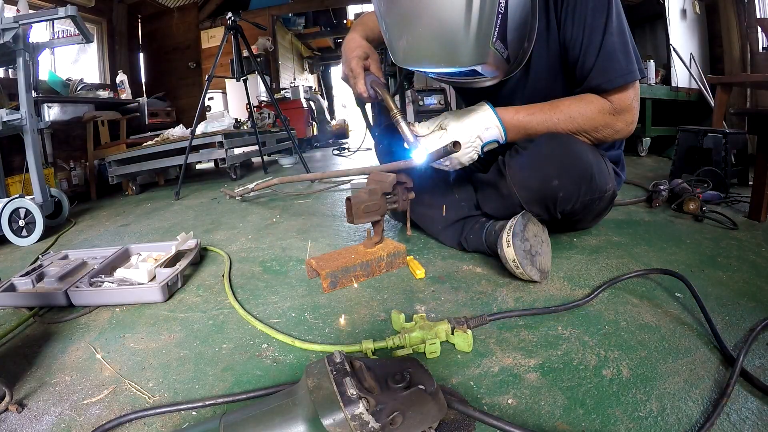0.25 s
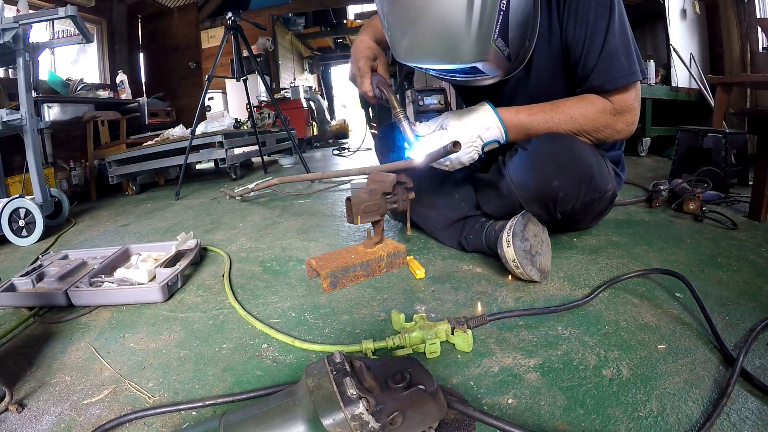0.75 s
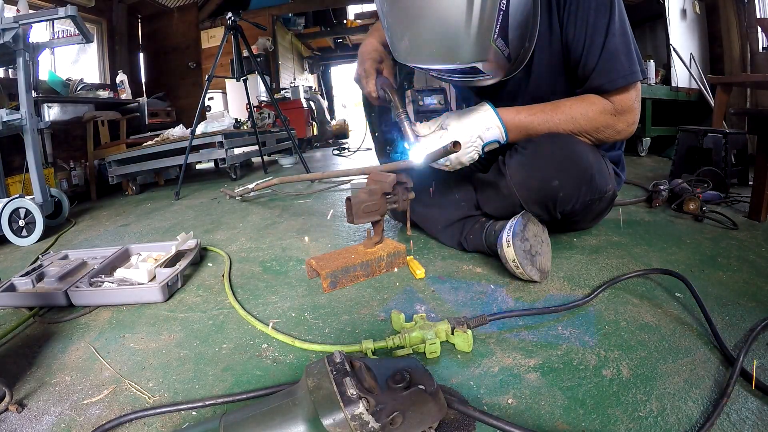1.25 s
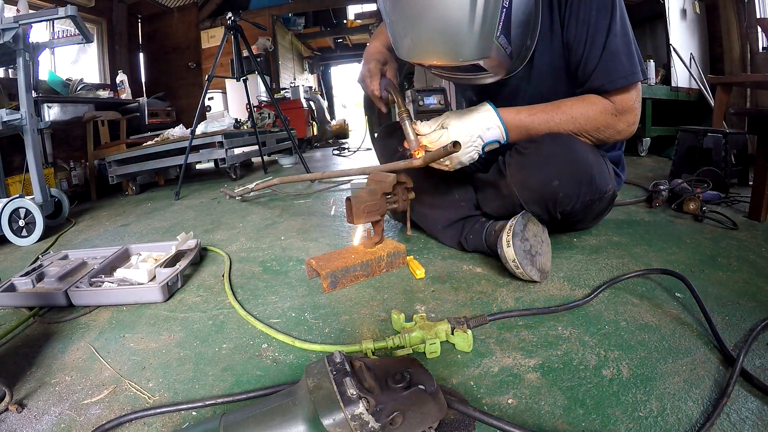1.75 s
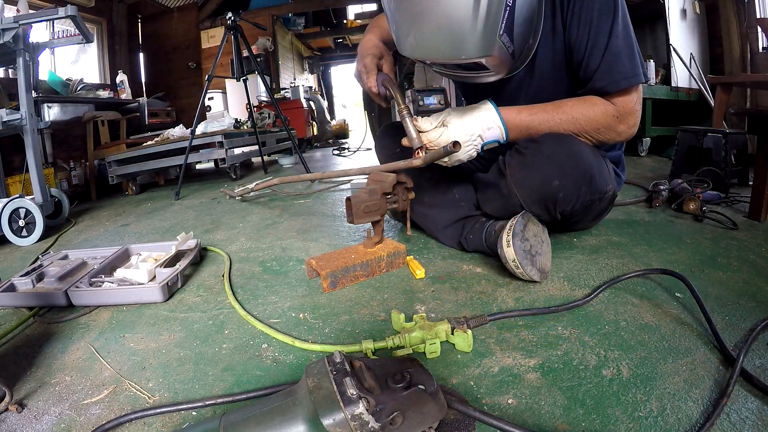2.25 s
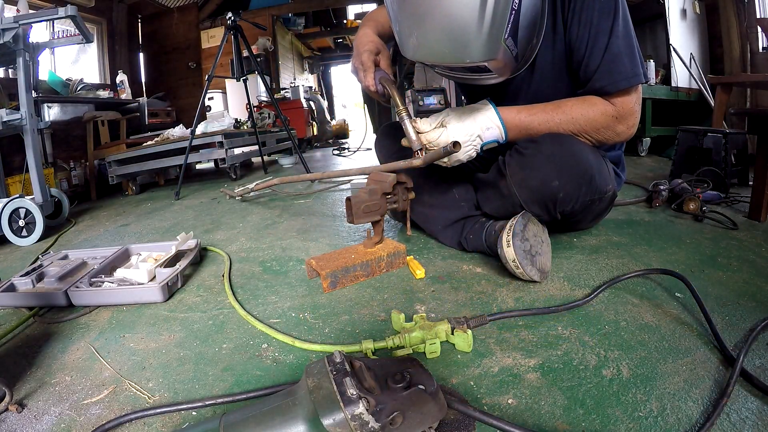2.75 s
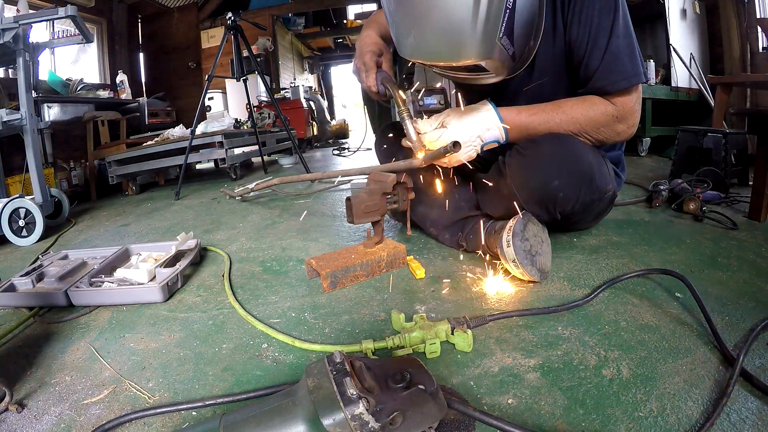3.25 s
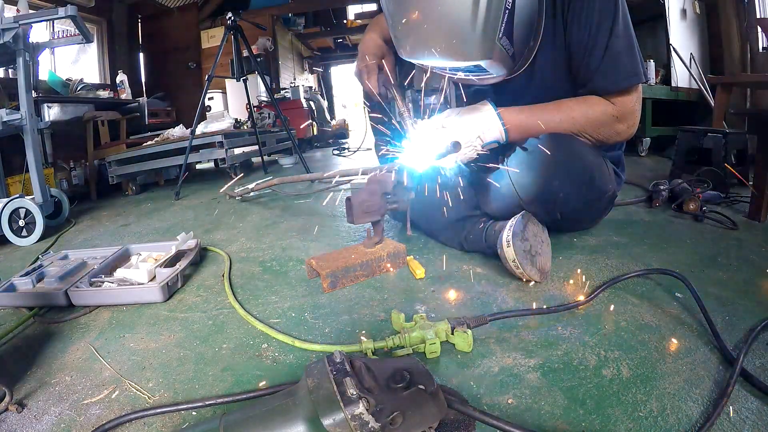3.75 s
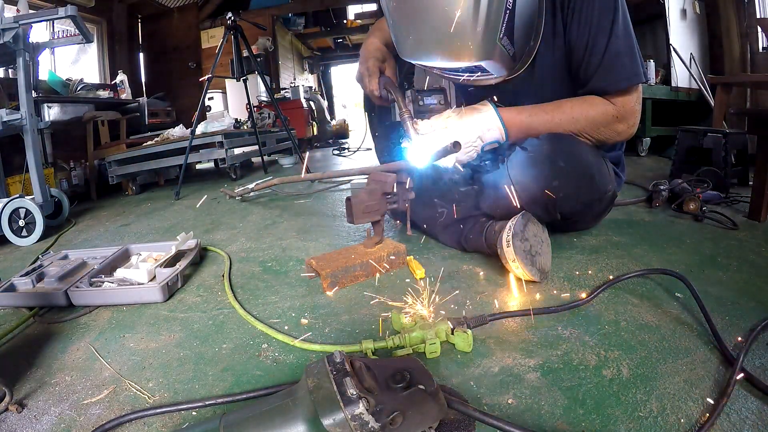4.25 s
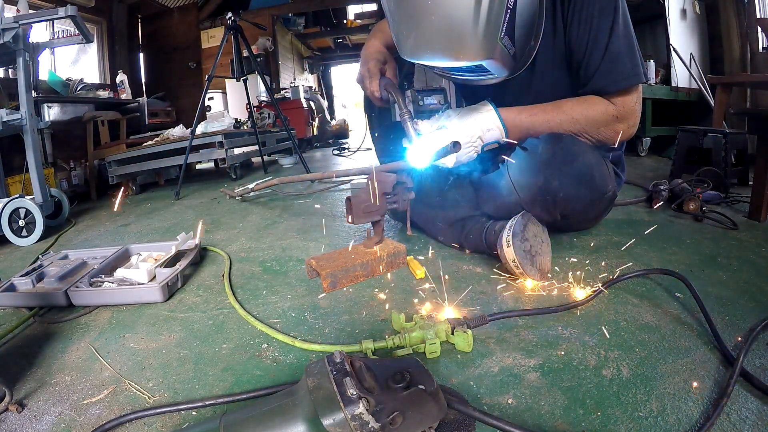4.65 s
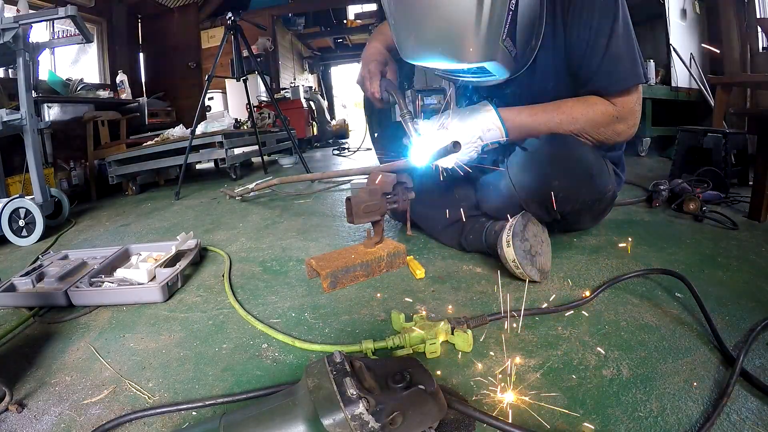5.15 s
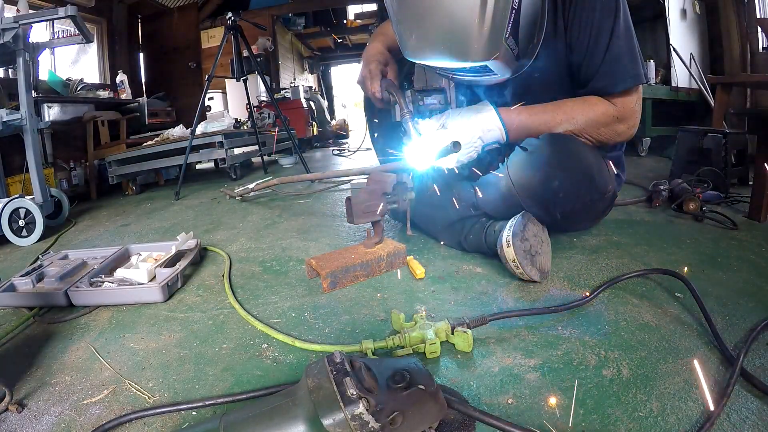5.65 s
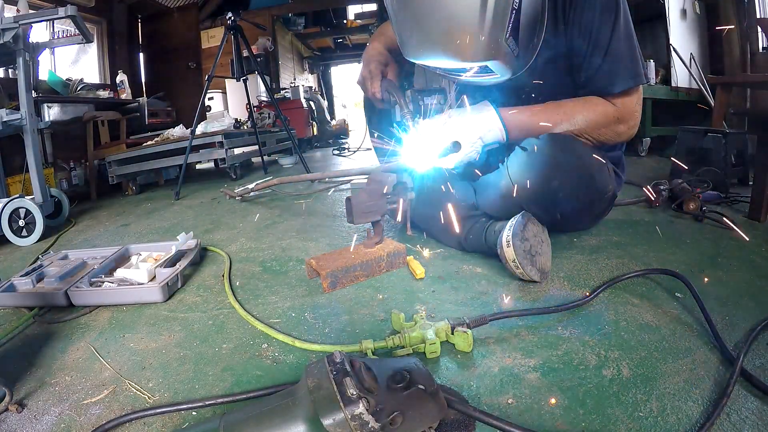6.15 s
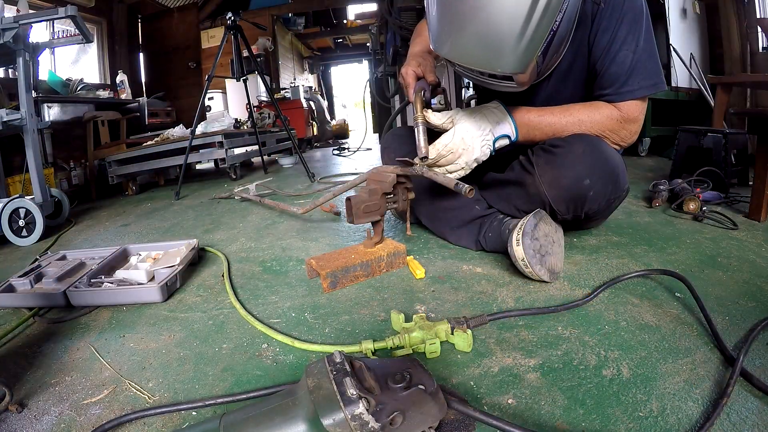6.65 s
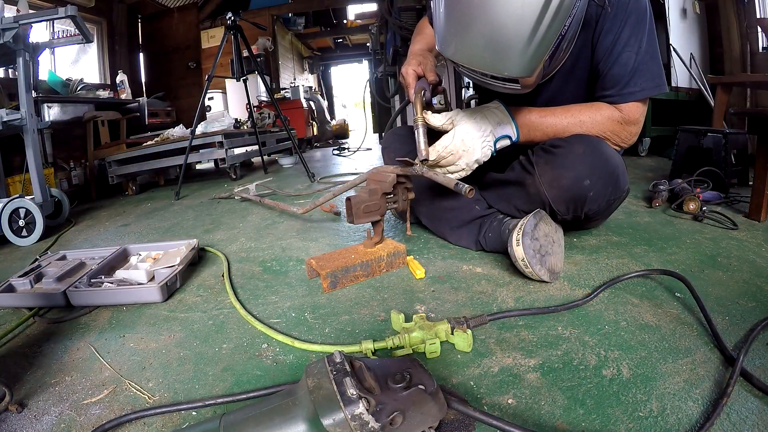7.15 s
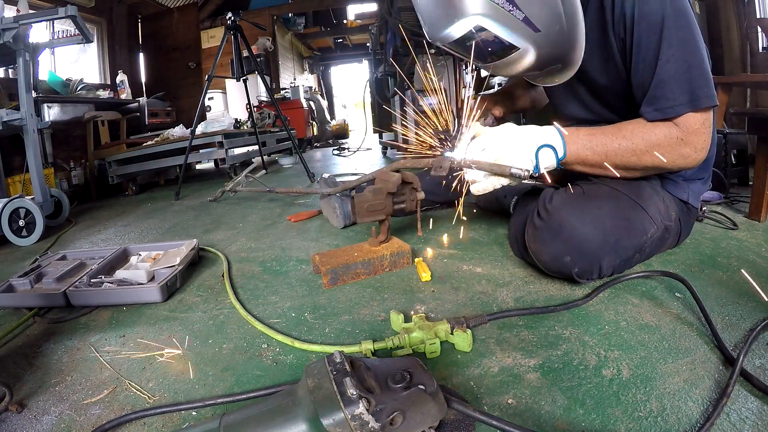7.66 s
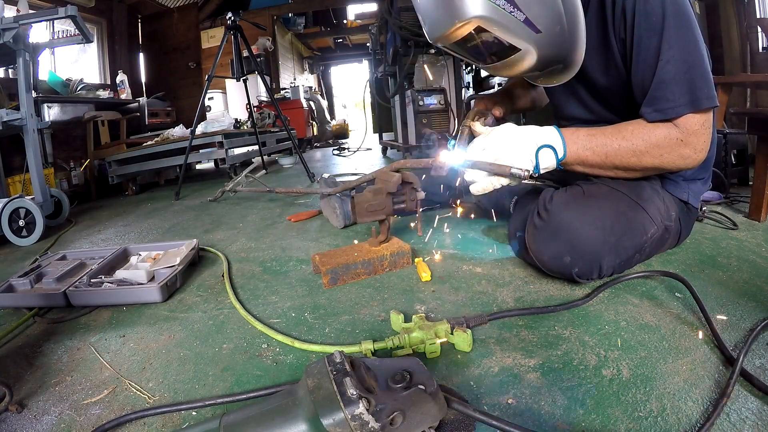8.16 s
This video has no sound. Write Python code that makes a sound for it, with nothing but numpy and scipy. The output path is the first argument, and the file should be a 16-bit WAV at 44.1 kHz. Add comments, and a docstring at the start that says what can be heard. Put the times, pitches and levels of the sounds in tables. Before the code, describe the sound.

A small stereo camera on a workshop floor hears a wire-feed welder. Its fan runs throughout, a steady mid-low hum near 650 Hz with airy rush and slight case resonance. From 0 to 1.6 s the arc stutters: sharp noisy snaps with short low thumps, brief frying, and rapid buzzing runs around 0.45-0.6 and 0.9-1.1. Bright shed echoes fade, leaving mostly hum until about 3 s. Then denser, harder crackling lasts to 6.2 s, uneven in strength, with a faint deep rumble swelling around 4 s and thinning away. At 6.25 an abrupt cut leaves the fan alone, noticeably fuller. At 7.6 another cut enters on a fading noise tail, followed by separate pops of altered colour at roughly 7.7, 7.8, 8.0 and 8.3. Automatic gain ducks sharply at loud cracks and gradually recovers.

```python
"""A wire-feed welder tacks a steel pipe in a workshop over its fan, heard from a small camera on the floor.
From the start the wire shorts and blows clear in pops and quick runs: a noise-burst crack and a thump of gas,
both doubled by the floor, then frying grains and the shed's bright noise-tail echo. Around 4 s a rumble swells.
At 6.25 s a jump cut chops off the crackle and leaves the fan's blade tones, air and case resonances; at 7.6 s
another lands in a fading pop tail, then pops of another colour. Within each part a gain control ducks at hard
pops and swells back steadily; it jumps at the cuts."""
import sys
import numpy as np
from scipy import signal
from scipy.fft import rfft, irfft
from scipy.io import wavfile
from scipy.ndimage import uniform_filter1d

SR = 44100
rng = np.random.default_rng(int(sys.argv[2]) if len(sys.argv) > 2 else 0)


def generate_wav(sig):
    """Save sig (samples, or channels by samples) to the path in sys.argv[1] as 16-bit PCM at SR."""
    pcm = np.round(np.clip(np.atleast_2d(sig).T, -1, 1) * 32767).astype(np.int16)
    wavfile.write(sys.argv[1], SR, pcm)


N = 370440
TIME = np.arange(N) / SR
# jump cuts bound a part with the fan alone
FAN_ALONE_START_S, FAN_ALONE_END_S = 6.249, 7.596

# colour of the bursting wire, for cracks and sizzle: pitch_hz, relative_level_db (per Hz)
CRACK_COLOUR = [(300,-24), (1300,-14.5), (1820,-2.5), (2250,-12), (2700,-23.5), (3400,-15.5), (4100,-8),
                (4750,-20), (6000,-7), (7800,-13), (8500,-15.5), (11300,-25.5), (14000,-18), (16000,-24)]
# bright colour of the shed's echo, also of the fading tails: pitch_hz, relative_level_db (per Hz)
SHED_COLOUR = [(50,-19.5), (110,-13.5), (165,22.5), (280,6.5), (500,8.5), (900,6.5), (1400,-1.5),
               (1850,-1.5), (2700,-8.5), (4100,-2.5), (4900,-5), (6300,2), (7800,4), (8400,-4.5),
               (11500,-11), (15000,-23)]


def undb(db):
    """Decibels to gain."""
    return 10 ** (np.asarray(db) / 20)


def unit(x):
    """Scale to rms 1."""
    return x / np.sqrt(np.mean(x ** 2))


def colour(x, spectrum):
    """Causal minimum-phase filter with the given (Hz, dB) response, built from its cepstrum."""
    size = 4096
    hz, db = np.transpose(spectrum)
    bins = np.log(np.fft.rfftfreq(size, 1 / SR) + 1)
    gain = undb(np.interp(bins, np.log(hz), db))
    # folding the cepstrum forward in time makes the response causal
    cepstrum = irfft(np.log(gain))[:size // 2]
    cepstrum[1:] *= 2
    response = irfft(np.exp(rfft(cepstrum, size)))
    return signal.oaconvolve(np.atleast_2d(x), response[None], axes=1)[:, :x.shape[-1]]


def stereo_noise(size, apart_hz=1100):
    """Noise at two close ports: alike in the bass, unrelated in the treble."""
    mid, side = rfft(rng.standard_normal((2, size)))
    alike = np.exp(-(np.fft.rfftfreq(size, 1 / SR) / apart_hz) ** 2) ** .5
    mid = mid * np.sqrt(1 + alike)
    side = side * np.sqrt(1 - alike)
    return unit(irfft([mid + side, mid - side], size))


def walk(rate):
    """Slow random drift of rms 1, with `rate` fresh values per second."""
    k = int(SR / rate)
    steps = np.repeat(rng.standard_normal(N // k + 1), k)
    return unit(uniform_filter1d(steps, k)[:N])


def strike(times, gains, shapes):
    """Lay one scaled shape at each time."""
    out = np.zeros((shapes.shape[1], N + shapes.shape[2]))
    for s, gain, shape in zip(times, gains, shapes):
        i = int(np.clip(s * SR, 0, N))
        out[:, i:i + shape.shape[1]] += gain * shape
    return out[:, :N]


def floor_bounce(x, lag_s, share):
    """The concrete floor sends a weaker second copy just behind the first."""
    late = np.array([np.interp(TIME - lag_s, TIME, row, left=0) for row in x])
    return x + share * late


def fan(air_db=-33, waver_db=2.07, wander_hz=0.082, case_width_hz=9):
    """The blades sing over rushing air, which also stirs the resonances of the case."""
    shaft_hz = 92.57
    # tones of the seven-bladed fan: multiple_of_shaft_rate, level_db (rms)
    fan_orders = [(4,-47), (5,-48), (7,-30), (11,-61.5), (12,-56.5), (21,-61.5)]
    # narrow resonances of the welder's case: pitch_hz, level_db (rms)
    case_modes = [(166,-46), (240,-46.5), (490,-53), (548,-47.5), (578,-48.5), (715,-51.5), (884,-54.5),
                  (8586,-79)]
    # colour of the rushing air: pitch_hz, relative_level_db (per Hz)
    air_colour = [(30,-40.5), (90,-39.5), (122,-28), (148,-3.5), (250,-0.5), (310,-7), (560,-3.5), (700,-8),
                  (800,-17.5), (1400,-21.5), (2000,-24.5), (2650,-32.5), (3300,-29), (4200,-37), (7300,-32),
                  (9300,-42.5), (14000,-63.5)]

    # wander_hz is the drift of the seventh order, the blade tone
    turns = np.cumsum(shaft_hz + wander_hz / 7 * walk(4.2)) / SR
    blades = 0
    for order, db in fan_orders:
        tone = np.sin(2 * np.pi * (order * turns + rng.random()))
        blades = blades + undb(db + waver_db * walk(3.9)) * tone
    case = 0
    for hz, db in case_modes:
        # a random complex envelope spreads the tone into a narrow band
        envelope = walk(case_width_hz) + 1j * walk(case_width_hz)
        case = case + undb(db) * np.real(envelope * np.exp(2j * np.pi * hz * TIME))
    air = unit(colour(stereo_noise(N), air_colour)) * undb(air_db + .5 * walk(3.38))
    return np.sqrt(2) * blades + case + air


def rumble():
    """A faint deep flutter of bass noise, strongest around 4 s."""
    # level of the rumble: time_s, level_db (rms)
    rumble_levels = [(3.55, -64), (4.0, -36), (4.45, -39.5), (4.8, -45), (5.4, -49), (5.8, -56)]
    deep = colour(stereo_noise(N), [(20, -20), (65, 10), (110, 13), (250, -37), (900, -82)])
    return unit(deep) * undb(np.interp(TIME, *np.transpose(rumble_levels)))


def fading_tails():
    """Fading tails of bright echo noise, some already sounding as a part opens."""
    # fading noise tails: start_s, level_db (at the start), fade_s
    tail_events = [(0.0, -22.5, 0.1), (3.17, -25.5, 0.17), (6.089, -17, 0.047), (7.595, -22.5, 0.099)]
    fades = sum(undb(db) * (TIME >= s) * np.exp(-abs(TIME - s) / fade) for s, db, fade in tail_events)
    return fades * unit(colour(stereo_noise(N), SHED_COLOUR))


def arc_pops():
    """Each time the wire shorts and blows clear it pops; returns (times, crack dB, thump dB)."""
    # single pops of the stuttering arc: start_s, relative_level_db, extra_thump_db
    single_pops = [(.0712,-15.5,0), (.1775,-21.5,2), (.3643,-9.5,1.5), (.4229,-15.5,2), (.5599,-20,5),
                   (.7303,-19,2.5), (.8154,-20,2), (1.2962,-13,0.5), (1.3203,-20,5), (1.3304,-18.5,-3.5),
                   (1.57,-22.5,2), (1.6193,-23,3), (2.9904,-26,8.5), (3.1472,-17,1.5), (3.1614,-20.5,1.5),
                   (3.2015,-18,4.5), (3.3345,-10.5,3.5), (3.4663,-17,3), (3.4932,-16,5), (3.7474,-13,0),
                   (3.901,-10,2), (4.003,-15,4.5), (4.0456,-16,4), (4.099,-12.5,3), (4.2,-20,4.5),
                   (4.2355,-20,5.5), (4.2407,-27.5,5), (4.358,-20,3.5), (4.3934,-17.5,2), (4.403,-17,1.5),
                   (4.4216,-24.5,1), (4.4413,-20,3), (4.453,-25,8), (4.5984,-15,1), (4.818,-26.5,6.5),
                   (4.8363,-24,6), (4.88,-20,-0.5), (5.0097,-16.5,2), (5.1805,-16,2), (5.2464,-18,0.5),
                   (5.425,-11,1), (5.5454,-16,2), (5.595,-17,2.5), (5.65,-19.5,1), (5.699,-17.5,2),
                   (5.72,-27.5,6), (5.8897,-16,1), (6.0003,-19.5,1.5), (6.015,-23.5,4), (6.0797,-11.5,1),
                   (6.1106,-17,3), (6.1413,-20.5,5), (6.1907,-15.5,1), (7.68,-14,5.5), (7.8266,-13.5,3),
                   (7.9813,-13,2.5), (8.116,-24.5,6), (8.203,-22,5), (8.2903,-12.5,3)]
    # runs of repeated shorting: start_s, end_s, rate_per_s, relative_level_db, extra_thump_db
    pop_runs = [(0.4396,0.6166,118,-19.5,1.5), (0.9041,0.926,104,-18.5,-0.5), (.943,1.061,125,-22.5,3),
                (1.083,1.129,45,-22,2), (1.346,1.4157,43,-20.5,1), (3.603,3.6643,113,-14.5,3),
                (3.756,3.776,106,-19,4.5), (4.8983,4.917,88,-21.5,2.5), (5.264,5.276,140,-18.5,1.5),
                (5.6127,5.6332,86,-21.5,1.5), (6.2096,6.241,68,-19,4.5)]
    # pops within a run scatter in time, strength and thump weight
    jitter_s, scatter_db = 0.00072, 2.7

    runs = []
    for start, end, rate, db, weight in pop_runs:
        count = round((end - start) * rate) + 1
        runs += [(s, db, weight) for s in np.linspace(start, end, count)]
    runs = np.array(runs)
    runs = runs + rng.standard_normal(runs.shape) * [jitter_s, scatter_db, scatter_db]
    times, db, weight = np.vstack([single_pops, runs]).T
    return times, db, db + weight


def shed(pops, t60_s=0.49, low_t60_s=0.26, early_s=0.18, early=0.64, gap_s=0.0052, growth=0.86, echo_db=-6):
    """Cluttered walls scatter every pop into a noise tail whose treble lingers longest."""
    times, crack_db, thump_db = pops
    t = TIME[:SR * 4 // 5]
    onset = 1 - np.exp(-(t / gap_s) ** 2)
    scatter = colour(stereo_noise(len(t)), SHED_COLOUR) * onset * (1 + early * np.exp(-t / early_s))
    out = 0
    for kind, db, t60 in (("lowpass", thump_db, low_t60_s), ("highpass", crack_db, t60_s)):
        split = signal.butter(2, 900, kind, fs=SR, output="sos")
        tail = signal.sosfilt(split, scatter) * np.exp(-np.log(1000) * t / t60)
        # growth below 1 lets hard pops stand further out of their echo
        kicks = strike(times, undb(growth * db + echo_db), np.ones((len(times), 1, 1)))
        out = out + signal.oaconvolve(kicks, tail, axes=1)[:, :N]
    return out


def sizzle(pops, fade_s=0.0072, grain_db=5, sizzle_db=-5):
    """After each pop the relit arc fries for a moment in fine grains."""
    times, db, _ = pops
    t = TIME[:SR // 8]
    frying = (1 - np.exp(-t / 0.00017)) * np.exp(-t / fade_s)
    # overlapping frying adds up in power
    power = strike(times, undb(db + sizzle_db) ** 2, np.tile(frying ** 2, (len(times), 1, 1)))
    grains = undb(grain_db * np.repeat(rng.standard_normal(N // 20 + 1), 20)[:N])
    return np.sqrt(power) * unit(colour(stereo_noise(N, apart_hz=7160) * grains, CRACK_COLOUR))


def thumps(pops, push_s=.0001, uneven_db=3, thump_db=46):
    """The gas round the arc heaves once: a pressure swing, now sharper, now softer, that rings in the bass."""
    # ring of the heaving gas: pitch_hz, relative_level_db (per Hz)
    thump_colour = [(30,-30.5), (80,-29), (115,-17), (160,3), (240,2), (360,-5.5), (520,-0.5), (680,-8.5),
                    (850,-19), (1300,-26.5), (3000,-44), (8000,-68)]
    times, _, db = pops
    lengths = push_s * undb(uneven_db * rng.standard_normal((len(times), 1, 1)))
    pushes = np.exp(-TIME[:SR // 200] / lengths)
    pushes = pushes / pushes.sum(axis=2, keepdims=True)
    kicks = strike(times, -undb(db + thump_db), pushes)
    return floor_bounce(colour(kicks, thump_colour), 0.0013, 0.13)


def cracks(pops, apart=1.0, apart_hz=8200, apart_width_hz=2000, snap_s=0.014, crack_db=42):
    """The molten bridge bursts: a snap of harsh noise with an even spectrum, different every time."""
    # keener edge of the first spell, from the torch's angle: pitch_hz, relative_level_db (per Hz)
    first_colour = [(300,-27), (1300,-14), (1850,-2.5), (2250,-13), (2700,-21.5), (3400,-14.5), (4100,-8),
                    (4750,-20), (6050,-2), (7000,-16.5), (9800,-14.5), (11400,-31), (14500,-19.5),
                    (16000,-24)]
    # torch held at a new angle in the last part: pitch_hz, relative_level_db (per Hz)
    turned_colour = [(300,-28), (1300,-18), (1750,-2), (2400,-6), (2950,-23.5), (3500,-8.5), (4500,-10),
                     (5300,-18), (7300,-5.5), (9000,-18), (11500,-22.5), (14000,-19), (16000,-30)]
    first_spell_end_s, burst_s = 2.0, .0012

    times, db, _ = pops
    t = TIME[:SR // 100]
    noise = rng.standard_normal((len(times), 2, len(t))) * np.exp(-(t / burst_s) ** 2)
    mid, side = rfft(noise).transpose(1, 0, 2)
    # waves about as long as the camera is wide reach the two ports differently
    hz = np.fft.rfftfreq(len(t), 1 / SR)
    side = side * apart * np.exp(-((hz - apart_hz) / apart_width_hz) ** 2)
    # keeping only the phase evens the spectrum
    even = irfft(np.exp(1j * np.angle([mid + side, mid - side])), len(t))
    # the angle of the torch gives each spell its own colour
    spell = np.searchsorted([first_spell_end_s, FAN_ALONE_END_S], times)[:, None]
    colours = (first_colour, CRACK_COLOUR, turned_colour)
    bursts = np.stack([np.choose(spell, [colour(port, c) for c in colours]) for port in even], axis=1)
    bursts *= np.exp(-(t / snap_s) ** 2)
    return floor_bounce(strike(times, undb(db + crack_db), bursts), 0.00162, 0.17)


def scene():
    """Welding over the steady fan, with jump cuts into and out of the fan alone."""
    pops = arc_pops()
    active = (TIME < FAN_ALONE_START_S) | (TIME > FAN_ALONE_END_S)
    welding = uniform_filter1d(1. * active, size=100)
    arc = cracks(pops) + thumps(pops) + sizzle(pops) + shed(pops) + fading_tails() + rumble()
    return arc * welding + fan()


def gain_control(x, opening_db):
    """Sharp sounds push the gain down at once; it creeps back at a steady rate."""
    # treble level where ducking starts, share of the excess taken away, speed of the swell back
    duck_above_db, duck_share, recover_db_per_s = -25, 0.86, 10.5
    treble = signal.sosfilt(signal.butter(2, 1000, "highpass", fs=SR, output="sos"), x)
    level_db = 10 * np.log10(uniform_filter1d(np.mean(treble ** 2, axis=0), size=530) + 1e-12)
    demand = duck_share * np.maximum(level_db - duck_above_db, 0)
    # a running maximum against a rising ramp gives the steady recovery
    recovered = recover_db_per_s * TIME[:len(demand)]
    duck = np.maximum.accumulate(np.maximum(demand + recovered, opening_db)) - recovered
    return x * undb(-uniform_filter1d(duck, size=130))


def record(dry):
    """Each port colours the sound its own way; the gain ducks, peaks are rounded and the top is cut."""
    # the right port is boxy in the low mids: pitch_hz, left_minus_right_db, left_phase_lead_rad
    port_colour = [(200,-.5,0), (380,-2.5,-.1), (520,-6,-.25), (650,-13.8,.05), (800,-12,.5), (1050,-5,1.5),
                   (1400,-2,2.1), (1850,2,1.3), (2300,3,-.2), (3200,-1,.1), (8000,0,.1), (14000,3,0)]
    opening_duck_db, ceiling, top_hz = 11.5, .52, 15200

    hz, db, lead = np.transpose(port_colour)
    bins = np.log(np.fft.rfftfreq(N, 1 / SR) + 1)
    level = undb(np.interp(bins, np.log(hz), db) / 2)
    half = level * np.exp(.5j * np.interp(bins, np.log(hz), lead))
    ports = irfft(rfft(dry) * np.array([half, 1 / half]), N)
    # the scene jumps at both times, so each part opens with its own gain: ducked, open, ducked
    cuts = (np.array([FAN_ALONE_START_S, FAN_ALONE_END_S]) * SR).astype(int)
    parts = np.split(ports, cuts, axis=1)
    openings_db = (opening_duck_db, 0, opening_duck_db)
    ducked = np.hstack([gain_control(part, opening) for part, opening in zip(parts, openings_db)])
    rounded = ducked / (1 + (ducked / ceiling) ** 4) ** (1 / 4)
    return signal.sosfilt(signal.ellip(8, .2, 70, top_hz, fs=SR, output="sos"), rounded)


dry = scene()
out = record(dry)
generate_wav(out)
```